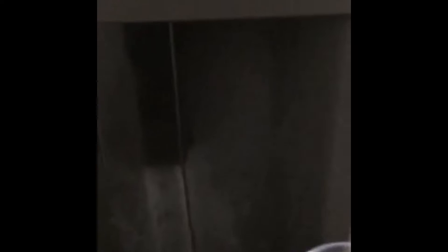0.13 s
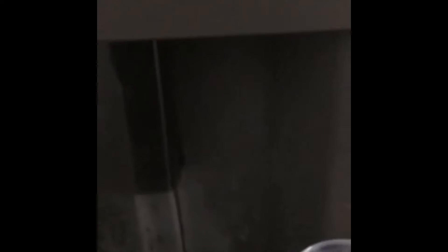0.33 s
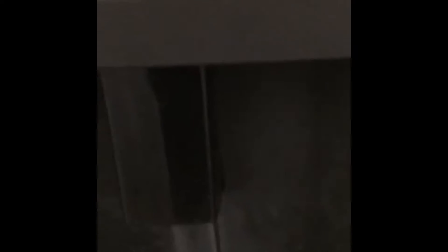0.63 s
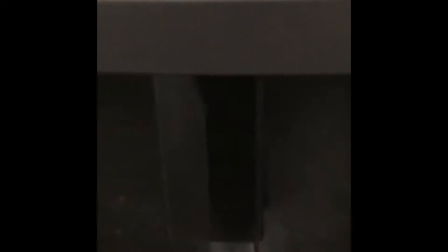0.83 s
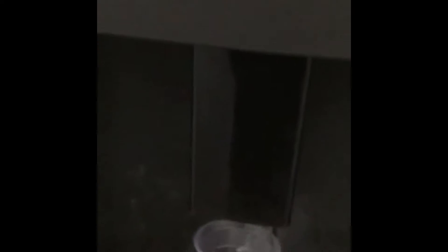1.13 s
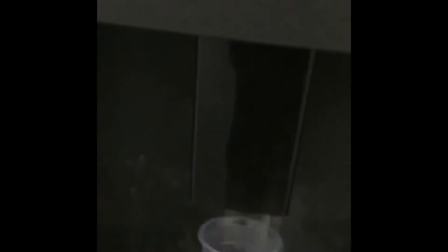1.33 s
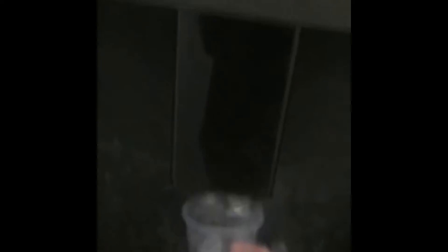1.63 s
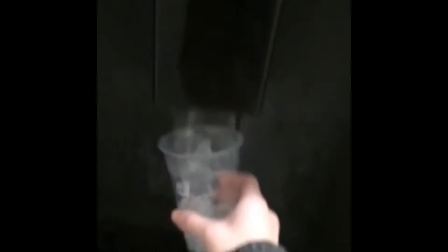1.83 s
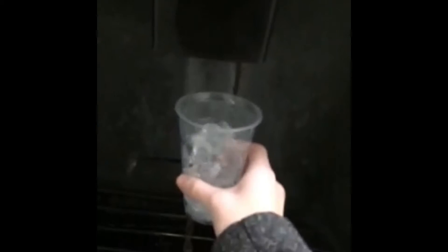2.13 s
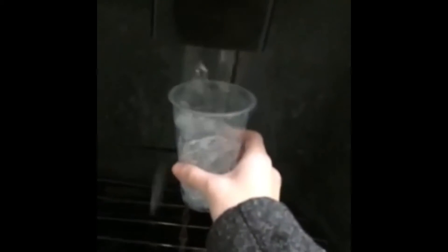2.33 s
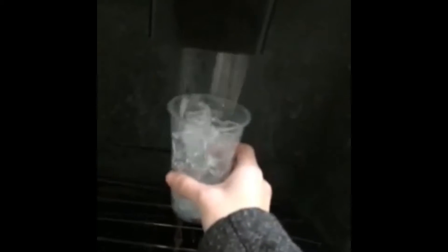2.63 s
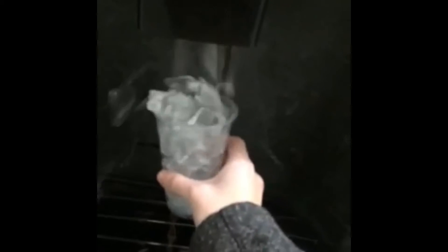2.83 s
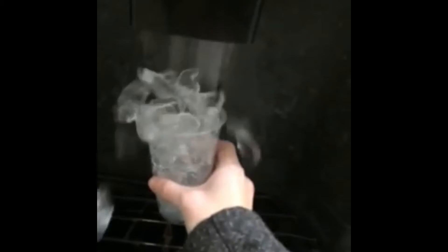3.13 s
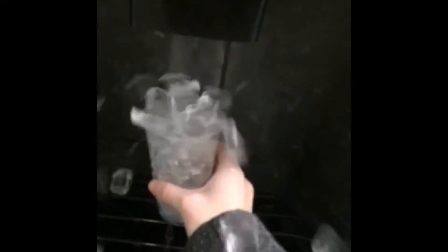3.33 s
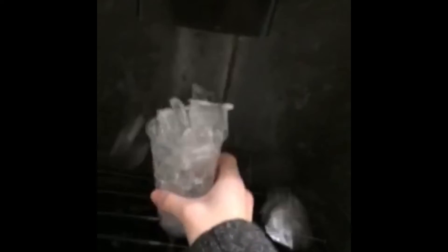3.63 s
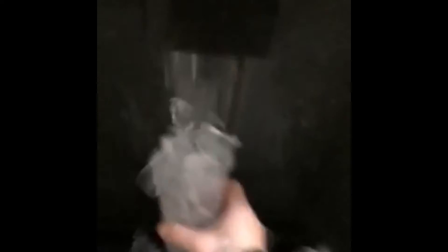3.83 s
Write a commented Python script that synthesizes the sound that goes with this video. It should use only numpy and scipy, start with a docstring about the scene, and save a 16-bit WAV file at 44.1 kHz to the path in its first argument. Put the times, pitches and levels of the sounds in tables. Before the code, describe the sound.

Ice cubes pour from a dispenser into a plastic cup, over a faint machine hum. A switch clicks at 0.4 seconds, then a motor thumps at 0.6 and churns the ice. From about 1.2 seconds until the end at 4, cubes crack brightly and rattle, the cup's hollow knock sinking as it fills. From 3 seconds, spilled cubes bounce on the drip tray. The alcove adds a short ring.

```python
"""Ice cubes pour from a dispenser into a plastic cup held in the hand.
Each cube cracks brightly and knocks the cup, whose note sinks as it fills.
The pile rattles, and spilled cubes bounce on the drip tray.
Before the pour, a switch clicks and a motor starts with a thump, then churns the ice.
The dispenser's alcove adds a short ring, over a faint machine hum."""
import sys
import numpy as np
from scipy import signal
from scipy.fft import rfft, irfft
from scipy.io import wavfile
from scipy.ndimage import uniform_filter1d

SR = 44100
rng = np.random.default_rng(int(sys.argv[2]) if len(sys.argv) > 2 else 0)


def unload_audio(sound):
    """Save the sound as a 16-bit wav file, at the path given as the first command line argument."""
    columns = np.transpose(np.atleast_2d(sound))
    # keep every value between -1 and 1, then stretch to whole-number steps
    steps = np.round(np.clip(columns, -1, 1) * 32767)
    wavfile.write(sys.argv[1], SR, steps.astype(np.int16))


N = 176400

# Tone colour of the room's air: pitch_hz, level_db
ROOM_COLOUR = [(25, -25), (90, 10.5), (1400, 0.5), (3500, -12), (15000, -25.5)]
# Notes that ring between the alcove's walls: pitch_hz, level_db, fade_s (time to fall 60 dB)
ALCOVE_NOTES = [(575.8, -2, 0.14), (710, -11.5, 0.34), (909, 4, 0.14)]
# Notes of the switch: pitch_hz, level_db, fade_s
SWITCH_NOTES = [(204, -2.5, 0.064), (448, 0, 0.014), (1490, -1, 0.0064)]
# Loudness of the motor's hum: time_s, level_db
MOTOR_LEVELS = [(.5, -58), (.59, -18.5), (.73, -21), (.76, -34), (.91, -21), (.95, -33), (1.025, -20),
                (1.06, -41), (1.125, -18), (1.17, -36), (4.0, -34)]
# Loudness of ice churning behind the chute: time_s, level_db
CHURN_LEVELS = [(.52, -52), (.56, -29.5), (.73, -32), (.755, -29), (1.0, -26), (1.15, -30), (4.0, -22)]
# Tone colour of that churning: pitch_hz, level_db
CHURN_COLOUR = [(25, -15), (180, -2), (300, -6), (900, -8.5), (1250, -4.5), (2300, -13.5), (4500, -18.5),
                (15000, -37.5)]
# Loudness of ice scraping down the chute: time_s, level_db
SCRAPE_LEVELS = [(.74, -54), (.76, -29.5), (.85, -64), (1.08, -35), (1.11, -24), (1.15, -38)]
# Spilled cubes hitting the drip tray: start_s, relative_level_db
TRAY_HITS = [(2.953, -13.5), (3.296, -17), (3.35, -14), (3.368, -15), (3.384, -14.5), (3.449, -10.5),
             (3.611, -14), (3.726, -18), (3.739, -12)]
# Notes of the tray: pitch_hz, level_db, fade_s
TRAY_NOTES = [(328, -4, 0.041), (449, 6.5, 0.032), (542, 7, 0.044), (910, 1, 0.027), (1140, 1.5, 0.036),
              (1300, 8, 0.024), (1740, 2, 0.015)]
# Loudness of the rattling pile: time_s, clink_db, relative_cup_db
RATTLE_LEVELS = [(1.14, -38, -13), (1.17, -26, -17.5), (1.24, -29, -24), (1.27, -25.5, -19),
                 (1.55, -23.5, -19), (1.6, -24.5, -25.5), (1.69, -29.5, -24.5), (1.97, -24, -22.5),
                 (2.14, -32.5, -40), (2.18, -22, -20.5), (2.24, -36, -32), (2.35, -36, -48),
                 (2.39, -24, -18), (2.5, -23, -20), (2.63, -26.5, -27), (2.78, -27, -25),
                 (2.88, -21.5, -23.5), (3.25, -21, -19), (3.31, -16.5, -18), (3.42, -23.5, -20),
                 (3.6, -22, -22), (3.91, -25, -26), (4.0, -23.5, -14.5)]
# Notes of the empty cup: pitch_hz, level_db, fade_s
CUP_NOTES = [(455, -8.5, 0.014), (557, -2.5, 0.02), (703, 0.5, 0.019), (775, 0, 0.023), (888, -4, 0.028),
             (1480, -8.5, 0.0047), (2040, -9, 0.017)]
# Tone colour of a bright crack: pitch_hz, level_db
CRACK_COLOUR = [(120, -22.5), (1300, 0), (2400, -5), (5600, -4), (8000, -7.5), (15500, -14)]
# Cubes landing in the cup: start_s, relative_crack_db, knock_db
LANDINGS = [(1.1542, -13.5, -6.5), (1.1636, -15, -12), (1.206, -12, -19), (1.2514, -10.5, -7),
            (1.2768, -13.5, -16), (1.2915, -12, -7.5), (1.3039, -13, -9.5), (1.3187, -12.5, -15),
            (1.372, -14.5, -11), (1.4135, -18.5, -15), (1.4395, -28, -10), (1.4498, -15, -10),
            (1.4801, -12.5, -15), (1.4985, -36, -14), (1.513, -21, -17), (1.5486, -12, -10.5),
            (1.699, -10, -29), (1.7604, -10, -8.5), (1.778, -26, -19), (1.8477, -13, -8.5),
            (1.8932, -9.5, -10.5), (1.9417, -10.5, -43), (1.958, -13.5, -7.5), (2.0502, -10.5, -24),
            (2.1063, -17.5, -18), (2.158, -6, -7.5), (2.2728, -11.5, -9.5), (2.36, -9.5, -11),
            (2.3755, -32, -11), (2.4248, -16, -34), (2.452, -14.5, -13), (2.5304, -14.5, -37),
            (2.57, -8, -8.5), (2.5963, -14, -15), (2.6472, -9, -15), (2.7228, -19, -16.5),
            (2.8014, -8.5, -15), (2.8141, -12, -8.5), (2.8305, -14, -9.5), (2.89, -10, -6.5),
            (2.9165, -14, -40), (2.952, -20, -8), (2.9676, -15, -29), (3.0463, -10, -17),
            (3.0678, -10, -16), (3.1299, -13.5, -22), (3.1465, -12, -11.5), (3.2139, -14, -21),
            (3.281, -16, -10), (3.3234, -13, -13.5), (3.3315, -11, -32), (3.384, -12.5, -33),
            (3.4312, -18, -12), (3.4948, -17, -26), (3.5235, -8, -36), (3.5815, -13.5, -22),
            (3.6053, -9.5, -24), (3.6148, -10, -14), (3.6414, -13.5, -12.5), (3.6855, -12.5, -26),
            (3.6965, -19, -30), (3.7966, -10.5, -12), (3.8099, -9, -16), (3.825, -15, -16),
            (3.8628, -7, -20), (3.9285, -10.5, -15), (3.9573, -7, -41), (3.964, -16, -17),
            (3.9892, -26, -14), (3.9958, -8.5, -31)]

POUR_START_S = LANDINGS[0][0]
HIT_SAMPLES = 6000
TIME_S, HIT_TIME_S = np.arange(N) / SR, np.arange(HIT_SAMPLES) / SR


def undb(db):
    """Turn decibels into a number to multiply by."""
    return 10 ** (np.asarray(db) / 20)


def unit(x):
    """Scale a sound to an average (rms) strength of 1."""
    return x / np.sqrt(np.mean(x ** 2) + 1e-18)


def burst(x, db, samples=260):
    """Scale a hit so that its loudest few milliseconds have this level."""
    return x * undb(db) / np.sqrt(uniform_filter1d(x ** 2, samples).max() + 1e-18)


def curve(table, column=1):
    """Join a table's timed points with straight lines."""
    table = np.array(table)
    return np.interp(TIME_S, table[:, 0], table[:, column])


def add(out, start_s, x):
    """Mix x into out at the given time."""
    i = int(np.clip(start_s * SR, 0, N - 1))
    out[i:i + len(x)] += x[:N - i]


def wander(steps_per_s):
    """Glide between random values, mostly within -1 to 1."""
    return np.interp(TIME_S * steps_per_s, np.arange(400), rng.standard_normal(400))


def colour(points, size=2048):
    """Make a filter with the given tone colour."""
    hz, db = np.array(points).T
    grid_hz = np.arange(size // 2 + 1) * SR / size + 1
    gain = undb(np.interp(np.log(grid_hz), np.log(hz), db))
    cepstrum = irfft(np.log(gain))
    # Fold it so that the filter never sounds before the hit.
    cepstrum[1:size // 2] *= 2
    cepstrum[size // 2 + 1:] = 0
    return irfft(np.exp(rfft(cepstrum)))


def through(x, response):
    """Pass a sound through a filter or a ringing object."""
    return signal.fftconvolve(x, response)[:len(x)]


def ring(notes, pitch_ratio=1, spread_db=3):
    """A struck object rings; each hit lands somewhere new and mixes its notes differently."""
    hz, db, fade_s = np.array(notes).T[:, :, None]
    gain = undb(db + spread_db * rng.standard_normal(hz.shape)) * rng.choice([-1, 1], hz.shape)
    fade = np.exp(-np.log(1000) * HIT_TIME_S / fade_s)
    return (gain * fade * np.cos(2 * np.pi * hz * pitch_ratio * HIT_TIME_S)).sum(0)


def contact(snap_s, rise_s=0.00033, tick_s=0.00072):
    """A brittle hit: a tick, a short snap of tiny clicks, then a weaker, longer crumble."""
    t = HIT_TIME_S
    noise, click_size = rng.standard_normal((2, HIT_SAMPLES))
    tick = np.exp(-t / tick_s)
    rise = 1 - np.exp(-t / rise_s)
    snap = np.exp(-(t / snap_s) ** 2)
    crumble = undb(-14) * np.exp(-t / (3 * snap_s))
    return noise * np.exp(0.36 * click_size) * (tick + rise * (snap + crumble))


def background(hum_hz=120, fan_hz=129):
    """Two close machine tones throb against each other, over the air of the room."""
    pitches_hz = [hz * (1 + 0.011 * wander(8.2)) for hz in (hum_hz, fan_hz)]
    hum = sum(np.sin(2 * np.pi * np.cumsum(hz) / SR) for hz in pitches_hz)
    air = through(rng.standard_normal(N), colour(ROOM_COLOUR))
    return undb(-35) * unit(hum) + undb(-38) * unit(air)


def alcove(x, echo_db, fade_s=0.15, delay_s=0.0042, dull_hz=7000, samples=16000):
    """Close walls send back a short, slightly duller echo with a few ringing notes."""
    t = np.arange(samples) / SR
    echoes = unit(rng.standard_normal(samples) * np.exp(-np.log(1000) * t / fade_s) * (t > delay_s))
    notes = unit(np.pad(ring(ALCOVE_NOTES, spread_db=-5), (0, samples - HIT_SAMPLES)))
    tail = (echoes + undb(-15.5) * notes) / np.sqrt(samples)
    tail = signal.sosfilt(signal.butter(1, dull_hz, fs=SR, output="sos"), tail)
    return x + undb(echo_db) * through(x, tail)


def clicks(switch_s=0.409, clutch_s=0.553):
    """The switch clacks and ticks; then the motor's clutch clicks."""
    out = np.zeros(N)
    add(out, switch_s, burst(through(contact(0.017), ring(SWITCH_NOTES)), db=-20.5))
    add(out, switch_s, burst(through(contact(0.027), colour(CRACK_COLOUR)), db=-33))
    add(out, clutch_s, burst(through(contact(0.023), colour(CRACK_COLOUR)), db=-28))
    return out


def motor(thump_at_s=0.559, thump_width_s=0.02, thump_hz=125.6, hum_hz=122.2, cabinet_hz=219.3):
    """The motor starts with a thump, then hums unevenly and makes the cabinet buzz."""
    buzz = undb(-13) * unit(through(rng.standard_normal(N), ring([(cabinet_hz, 0, 0.06)])))
    t = TIME_S - thump_at_s
    thump = undb(-4) * np.exp(-(t / thump_width_s) ** 2) * (np.sin(2 * np.pi * thump_hz * t) + buzz)
    phase = 2 * np.pi * np.cumsum(hum_hz * (1 + 0.0488 * wander(21.86))) / SR
    hum = unit(np.sin(phase) + undb(-22.5) * np.sin(2 * phase) + buzz)
    hum *= undb(curve(MOTOR_LEVELS) + 2 * wander(45))
    return thump + hum * (TIME_S > MOTOR_LEVELS[0][0])


def chute(flutter_db=3.5):
    """Ice grinds behind the chute and scrapes down it before the first cube lands."""
    grit = rng.standard_normal(N) * undb(3.6 * wander(90) + 2.7 * rng.standard_normal(N))
    scrape = unit(through(grit * undb(flutter_db * wander(140)), colour(CRACK_COLOUR)))
    scrape *= undb(curve(SCRAPE_LEVELS)) * (TIME_S > SCRAPE_LEVELS[0][0]) * (TIME_S < POUR_START_S)
    churn = unit(through(grit, colour(CHURN_COLOUR))) * undb(curve(CHURN_LEVELS))
    return scrape + churn * (TIME_S > CHURN_LEVELS[0][0])


def spilled_cubes(gap_s=0.012, first_db=3, loss_db=3):
    """Cubes that miss the cup bounce on the tray, more softly each time."""
    out = np.zeros(N)
    for start_s, db in TRAY_HITS:
        for bounce in range(4):
            tray = ring(TRAY_NOTES, pitch_ratio=np.exp(0.053 * rng.standard_normal()))
            hit = through(contact(snap_s=0.0058), tray)
            add(out, start_s, burst(hit, db + first_db - bounce * loss_db, samples=440))
            start_s += gap_s * (0.5 + rng.random())
    return out


def stir(boost_db=6, settle_s=0.025):
    """Each landing cube stirs the pile, which is louder until it settles."""
    starts_s = np.sort(np.array(LANDINGS)[:, 0])
    since_s = np.abs(TIME_S - starts_s[np.searchsorted(starts_s, TIME_S) - 1])
    return undb(boost_db * np.exp(-since_s / settle_s))


def pile_rattle(hits_per_s=260, choices=32):
    """Cubes jostle in the pile: many small hits, each clinking and shaking the cup."""
    clinks, cup = np.zeros(N), np.zeros(N)
    first_s, end_s = RATTLE_LEVELS[0][0], N / SR
    # A stock of hits to pick from, running from the empty cup to the fullest.
    stock = [(burst(ice_crack(snap_s=0.0036), 0), burst(cup_knock(s, snap_s=0.0017), 0))
             for s in np.linspace(first_s, end_s, choices * 8)]
    chances, sizes = rng.random((1600, 2)), rng.standard_normal((1600, 2))
    for k, ((delay, pick), (clink_size, knock_size)) in enumerate(zip(chances, sizes)):
        start_s = POUR_START_S + (k + 4 * delay) / hits_per_s
        if start_s < end_s:
            filled = (start_s - first_s) / (end_s - first_s)
            clink, knock = stock[int(filled * (len(stock) - choices) + pick * choices)]
            add(clinks, start_s, clink * undb(2.5 * clink_size))
            add(cup, start_s, knock * undb(2 * knock_size))
    clinks = unit(clinks * stir()) * undb(curve(RATTLE_LEVELS, column=1))
    cup = unit(cup * stir()) * undb(curve(RATTLE_LEVELS, column=2) - 1.5)
    return clinks + cup


def cup_knock(start_s, snap_s, sink_per_s=0.093, scatter_per_s=0.059):
    """The cup's wall and hollow ring, lower and less steady in pitch as the ice piles up."""
    filling_s = start_s - POUR_START_S
    scatter = (0.015 + scatter_per_s * filling_s) * rng.standard_normal()
    pitch_ratio = np.exp(scatter - sink_per_s * filling_s)
    return through(contact(snap_s), ring(CUP_NOTES, pitch_ratio))


def ice_crack(snap_s, low_hz=2600, high_hz=13000, fade_s=0.014):
    """Ice hits ice: a crunch and a brief ring, with each cube's own notes and tone colour."""
    crunch = contact(snap_s)
    notes = [(hz, 0, fade_s) for hz in low_hz * (high_hz / low_hz) ** rng.random(12)]
    own_colour = colour([(hz, db + 2.5 * rng.standard_normal()) for hz, db in CRACK_COLOUR])
    ringing = unit(through(crunch, ring(notes)))
    return through(unit(crunch) + undb(-9) * ringing, own_colour)


def falling_cubes(growth_per_s=0.19, knock_lag_s=0.00123):
    """Each cube cracks and knocks the cup, crunching for longer as the pile deepens."""
    out = np.zeros(N)
    for start_s, crack_db, knock_db in LANDINGS:
        snap_s = 0.005 * (1 + growth_per_s * (start_s - POUR_START_S))
        add(out, start_s, burst(ice_crack(snap_s), crack_db - 0.5))
        knock = cup_knock(start_s, snap_s=0.0015)
        add(out, start_s + knock_lag_s, burst(knock, knock_db, samples=350))
    return out


def scene():
    """Ice and clicks echo in the alcove, over the motor and the background hum."""
    clicking, drone = clicks(), motor()
    pour = alcove(clicking + chute() + falling_cubes() + spilled_cubes(), echo_db=-8.5)
    pile = alcove(pile_rattle(), echo_db=-5.5)
    return (pour + pile + drone + background())[None]


def record(dry, start_s=0.1207, fade_in_s=0.03, drive=0.97, top_hz=15300):
    """Fade the sound in, round off the loudest peaks and cut the highest treble."""
    fade_in = np.clip((TIME_S - start_s) / fade_in_s, 0, 1)
    rounded = np.tanh(drive * dry * fade_in) / drive
    return signal.sosfilt(signal.ellip(10, 0.2, 80, top_hz, fs=SR, output="sos"), rounded)


dry = scene()
out = record(dry)
unload_audio(out)
```